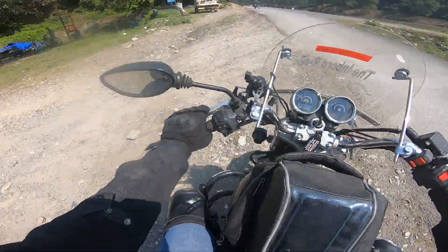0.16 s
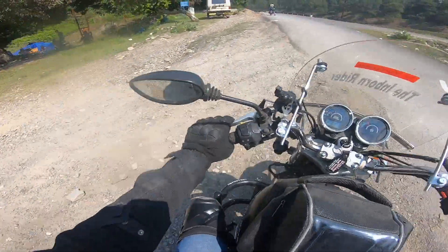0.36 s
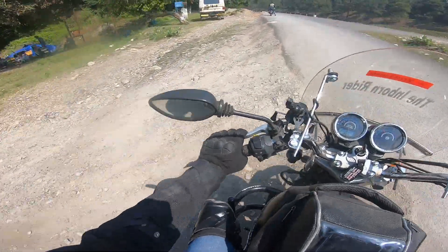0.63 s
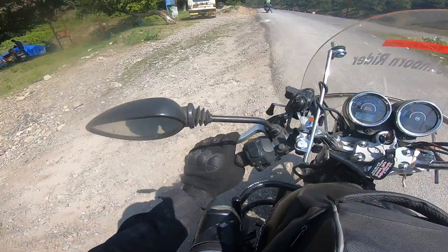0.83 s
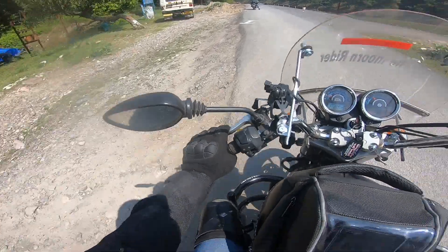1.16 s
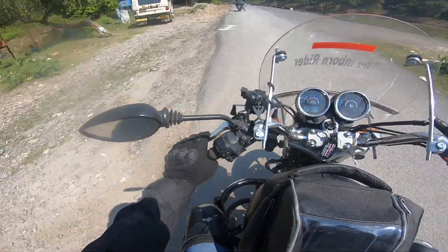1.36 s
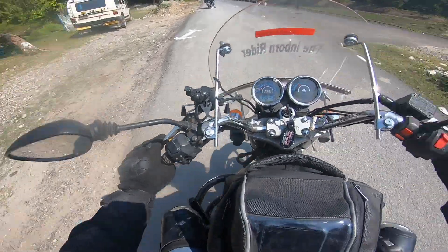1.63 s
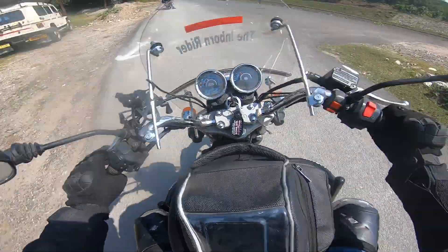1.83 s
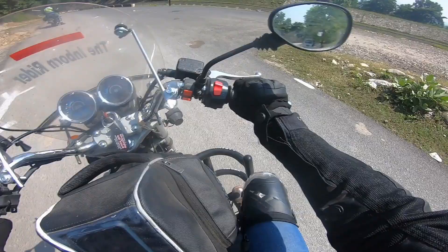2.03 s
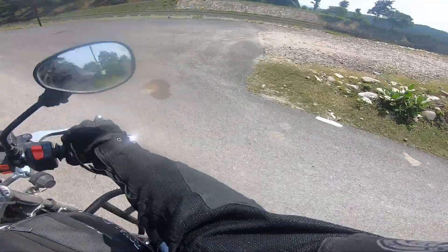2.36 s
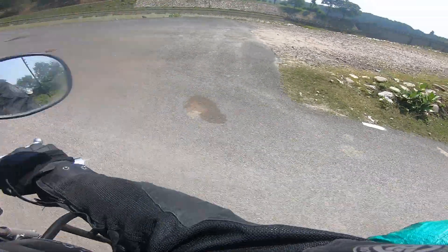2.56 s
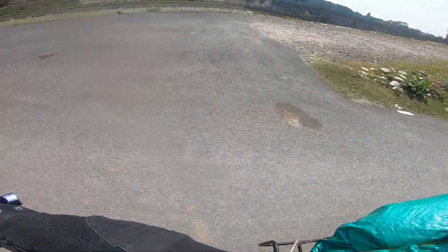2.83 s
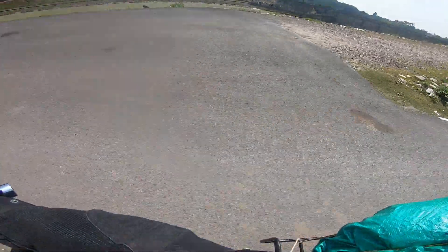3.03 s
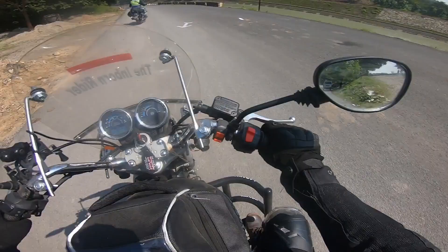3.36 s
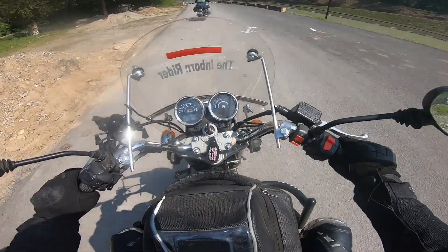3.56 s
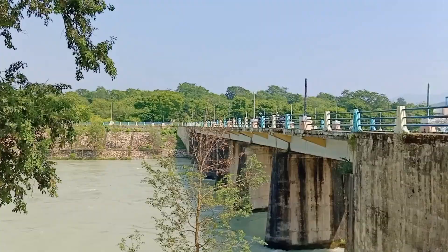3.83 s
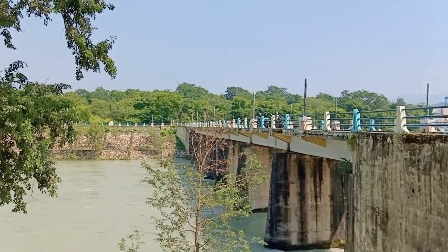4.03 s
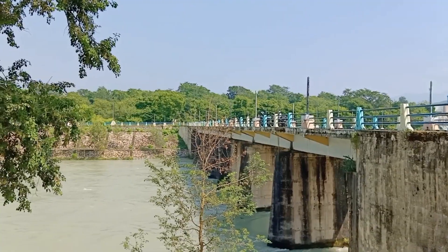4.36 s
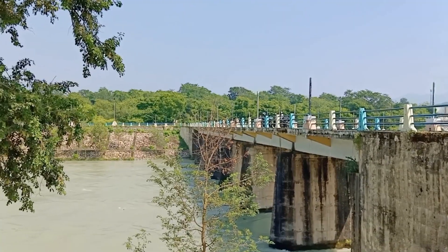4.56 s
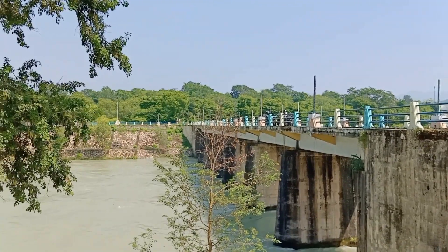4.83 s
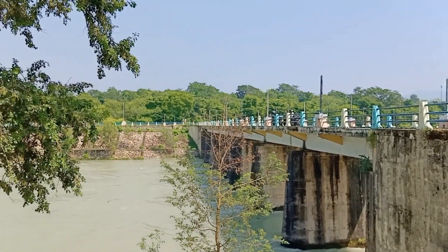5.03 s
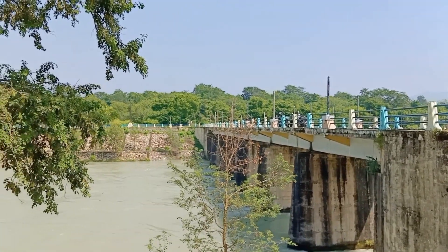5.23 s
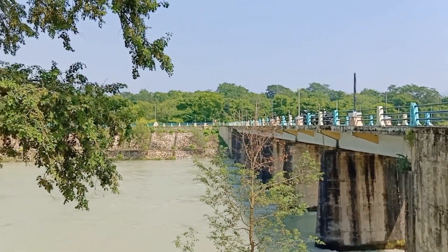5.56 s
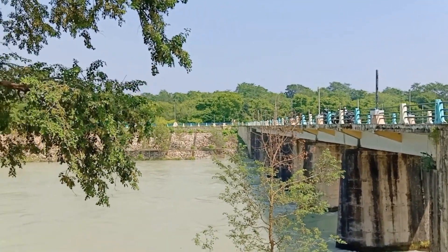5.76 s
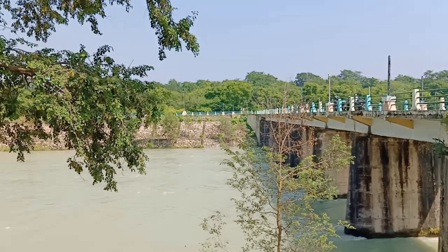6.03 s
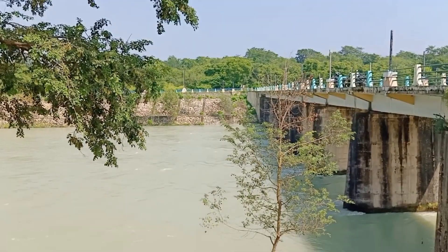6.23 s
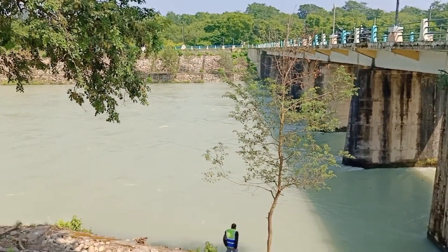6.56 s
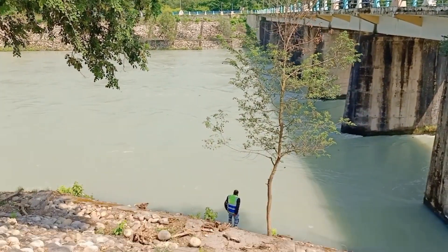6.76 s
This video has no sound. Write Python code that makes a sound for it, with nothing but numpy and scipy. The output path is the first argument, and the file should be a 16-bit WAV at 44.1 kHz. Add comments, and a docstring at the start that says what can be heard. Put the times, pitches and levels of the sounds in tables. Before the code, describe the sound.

Two single-cylinder motorcycles boom, clatter and thump over crunching gravel, easing through a turn, then cut abruptly to a quiet riverside with rushing water and chirps.

```python
"""On a gravel shoulder, heard inside a rider's helmet, two single-cylinder motorcycles pull away.
The near engine booms and clatters until its throttle shuts; the other thumps close by, slows and picks up.
The engines are pulses, one or two per cycle, that ring metal bodies; wind, tyres and grit are shaped noise.
The ride cuts off and a quiet river bank fades in: noise for water, rustles and insects, ringing bubbles
and knocks, and high falling whistles, perhaps small birds."""
import sys
import numpy as np
from scipy import signal
from scipy.fft import rfft, irfft, next_fast_len
from scipy.io import wavfile
from scipy.ndimage import uniform_filter1d, map_coordinates

SR = 44100
rng = np.random.default_rng(int(sys.argv[2]) if len(sys.argv) > 2 else 0)


def put_to_file(sound):
    """Save the sound as 16-bit audio at rate SR, in the file named by the first command-line argument."""
    columns = np.atleast_2d(sound).T  # one column per channel
    safe = np.clip(columns, -1, 1)
    whole_steps = np.round(safe * 32767)
    wavfile.write(sys.argv[1], SR, whole_steps.astype(np.int16))


N = 303716
TIME = np.arange(N) / SR
SIZE = next_fast_len(N, real=True)
BINS_HZ = np.fft.rfftfreq(SIZE, 1 / SR)

# In every spectrum and every list of ringing tones, level_db only compares its own rows.
# hiss of gears and chain, also used for sprayed gravel: pitch_hz, level_db (per Hz)
HISS_SPECTRUM = [(530, -55.5), (900, -16), (1120, -11.5), (1240, -6.5), (1690, -11), (1930, -11.5),
                 (2150, -12.5), (2570, -16.5), (2790, -14), (3400, -22), (3950, -21), (5000, -24),
                 (6050, -37), (8050, -38.5), (13400, -71.5), (15500, -79)]
# dry rustle, also the colour of one tick: pitch_hz, level_db (per Hz)
RUSTLE_SPECTRUM = [(100, -30), (400, 6), (2500, 0.5), (5800, 1), (8000, -14.5), (12000, -9.5), (15500, -15)]
# high falling chirps, perhaps small birds: middle_s, level_db, half_length_s
BIRD_CHIRPS = [(4.2, -47.5, 0.035), (5.02, -53, 0.016), (5.39, -55, .02), (5.52, -59, .05),
               (5.775, -44, 0.02), (5.87, -51, 0.014), (5.95, -49, 0.037), (6.2, -58, 0.018),
               (6.47, -53, 0.017), (6.67, -41, 0.015), (6.795, -42.5, 0.015)]


def amp(db):
    """Turns decibels into a factor on the waveform."""
    return 10 ** (np.asarray(db) / 20)


def evened(x):
    """Scales a signal to an average (RMS) size of 1."""
    return x / np.sqrt(np.mean(x ** 2) + 1e-20)


def follow(rows):
    """Draws straight lines between the rows, giving every column a value at each sample."""
    s, *columns = np.transpose(rows)
    return [np.interp(TIME, s, c) for c in columns]


def read(points, hz):
    """Reads a spectrum between its points, along a log-frequency axis."""
    f, value = np.transpose(points)
    return np.interp(np.log(hz + 1), np.log(f + 1), value)


def filtered(x, gain):
    """Applies a gain to every frequency bin."""
    return irfft(rfft(x, SIZE) * gain, SIZE)[:N]


def colour(x, spectrum):
    """Filters a sound by a spectrum; white noise keeps its level."""
    return filtered(x, evened(amp(read(spectrum, BINS_HZ))))


def noise(spectrum):
    """Makes random noise with the given spectrum."""
    return colour(rng.standard_normal(N), spectrum)


def wide(spectrum, same):
    """Makes two channels of noise with a given likeness: 0 separate, 1 identical."""
    shared = noise(spectrum)
    separate = np.array([noise(spectrum), noise(spectrum)])
    return np.sqrt(same) * shared + np.sqrt(1 - same) * separate


def wander(hz):
    """Makes a random drift of unit size whose changes fade out above the given rate."""
    return evened(filtered(rng.standard_normal(N), 1 / (1 + (BINS_HZ / hz) ** 4)))


def swells(rows):
    """Makes bell-shaped rises of level."""
    return sum(amp(db) * np.exp(-((TIME - s) / half) ** 2 / 2) for s, db, half in rows)


def blows(rows):
    """Makes sudden rises of level that die away."""
    return sum(amp(db) * (TIME >= s) * np.exp(-abs(TIME - s) / decay) for s, db, decay in rows)


def add(mix, s, sound):
    """Mixes a sound in at the given time."""
    part = mix[max(round(s * SR), 0):][:len(sound)]
    part += sound[:len(part)]


def body(modes, rise_s, pitch=1):
    """Gives what one blow rings with: dying tones that build up over rise_s."""
    t = TIME[:SR // 5]
    tones = sum(amp(db - 60 * t / t60) * np.sin(2 * np.pi * hz * pitch * t) for hz, db, t60 in modes)
    return tones * (1 - np.exp(-(t / rise_s) ** 2))


def struck(rows, modes, rise_s):
    """Strikes one object at set strengths and pitches; it radiates little below its lowest tone."""
    out = np.zeros(N)
    for s, db, pitch in rows:
        low_cut = signal.butter(2, .7 * pitch * min(modes)[0], "high", fs=SR, output="sos")
        sound = signal.sosfilt(low_cut, body(modes, rise_s, pitch))
        add(out, s, amp(db) * sound / abs(sound).max())
    return out


def ring(drive, modes, rise_s, stretch=1):
    """Rings a body with many blows, perhaps bent in pitch, to unit level."""
    # the body rings on its own clock, which runs faster where the pitch is raised
    clock = np.cumsum(stretch * np.ones(N))
    own_drive = np.bincount(np.round(clock).astype(int), drive)
    rung = signal.oaconvolve(own_drive, body(modes, rise_s))
    return evened(map_coordinates(rung, [clock], order=3))


def strokes(cycles, place, uneven_db, jitter_s):
    """Makes one pulse each time an engine passes a place in its cycle, uneven in size and timing."""
    at = np.flatnonzero(np.diff(np.floor(cycles - place)) > 0)
    size, late = rng.standard_normal((256, 2))[:len(at)].T
    moved = at + np.round(late * jitter_s * SR).astype(int)
    out = np.zeros(N)
    out[np.clip(moved, 0, N - 1)] = amp(uneven_db * size)
    return out


def surge(cycles, rise, decay):
    """Makes a level that swells and dies once in every cycle; times are shares of a cycle."""
    phase = cycles % 1
    return (1 - np.exp(-(phase / rise) ** 2)) * np.exp(-phase / decay) * (1 - phase ** 10)


def river():
    """Water is a steady noisy wash, less alike between the ears in the treble."""
    # wash of water: pitch_hz, level_db (per Hz)
    spectrum = [(24, -55), (40, -18), (130, -4), (200, -4), (305, -2), (420, -6.5), (540, -4), (810, -4),
                (1000, -7.5), (1350, -8.5), (2200, -6), (2700, -8.5), (3300, -15.5), (4000, -14.5),
                (5720, -13), (7160, -32), (13300, -38), (15500, -46)]
    # how alike left and right are: pitch_hz, likeness (1 identical; below 0 counts as 0)
    likeness = [(60, 0.81), (180, 1), (550, 0.7), (1650, -0.19), (4970, -0.22), (15000, -0.068)]
    same = np.clip(read(likeness, BINS_HZ), 0, 1)
    mid = filtered(noise(spectrum), np.sqrt((1 + same) / 2))
    side = filtered(noise(spectrum), np.sqrt((1 - same) / 2))
    return amp(-41.5) * np.array([mid + side, mid - side]) * amp(0.28 * wander(11))


def bubbles():
    """Small bubbles in the current each ring at one of twelve pitches."""
    births_per_s, low_hz, high_hz, t60_s = 100, 561, 835, 0.057
    pitches = np.geomspace(low_hz, high_hz, 12)
    out = np.zeros(N)
    for hz in pitches:
        born = rng.random(N) < births_per_s / len(pitches) / SR
        strength = amp(1.9 * np.minimum(rng.exponential(1, N), 3))
        out += signal.oaconvolve(born * strength, body([(hz, 0, t60_s)], rise_s=0.0033))[:N]
    return amp(-52.5) * evened(out)


def insects():
    """Insects shrill as a band of flickering noise; the same band swells under each bird chirp."""
    # shrill band: pitch_hz, level_db (per Hz)
    spectrum = [(3500, -50), (5000, -7), (5700, 2.5), (6200, -4), (7000, -15.5), (8500, -45)]
    level = amp(-57.5) + .55 * swells(BIRD_CHIRPS)
    return wide(spectrum, same=0.28) * level * evened(amp(3.3 * wander(90)))


def small_birds():
    """Each chirp, perhaps a small bird's, is a thin, fuzzy whistle that slides down."""
    middle_hz, fall, fuzz_hz = 5850, .085, 260  # fall is the share of pitch lost per half length
    out = np.zeros(N)
    for s, db, half in BIRD_CHIRPS:
        u = np.arange(-3 * half, 3 * half, 1 / SR) / half
        turns = np.cumsum(middle_hz * np.exp(-fall * u)) / SR
        add(out, s - 3 * half, amp(db) * np.exp(-u ** 2 / 2) * np.sin(2 * np.pi * turns))
    shared_fuzz = wander(fuzz_hz)
    ear_fuzz = np.array([wander(fuzz_hz), wander(fuzz_hz)])
    return out * (.8 * shared_fuzz + .8 * ear_fuzz)


def rustles():
    """Rustles and scuffs close by are short swells of rough noise."""
    # dry rustles: middle_s, level_db, half_length_s
    rustle_times = [(4.175, -40.5, 0.077), (4.555, -41, 0.057)]
    # duller scuffs: middle_s, level_db, half_length_s
    scuff_times = [(4.665, -46, 0.0099), (4.715, -42.5, 0.035), (5.917, -44, 0.0056), (5.998, -39.5, 0.025),
                   (6.367, -41.5, 0.0044)]
    # colour of the scuffs: pitch_hz, level_db (per Hz)
    scuff_spectrum = [(80, -25), (300, 7), (1200, 2.5), (2800, 0.5), (5000, -14), (12000, -28)]
    dry_rustle = wide(RUSTLE_SPECTRUM, same=.3) * swells(rustle_times) * evened(amp(1.8 * wander(120)))
    scuff = wide(scuff_spectrum, same=0.49) * swells(scuff_times) * evened(amp(3.3 * wander(200)))
    return dry_rustle + scuff


def knocks():
    """Knocks ring something hollow, and one tick is a dying burst of noise."""
    # knocks: start_s, level_db (of the peak), pitch_factor
    knock_times = [(4.667, -30, 0.59), (4.706, -34, 1.9), (4.714, -32, 1.53), (5.623, -30, 1.1),
                   (5.643, -23, 1.1), (5.647, -18.5, 0.97), (5.674, -30, 0.97), (5.681, -31, 1),
                   (5.697, -30, 1.3), (5.703, -30, .8), (5.732, -32, 0.74), (5.996, -34, 2.5),
                   (6.008, -32, 0.73), (6.115, -32, .5), (6.25, -27, 1.18)]
    # tones of the hollow object: pitch_hz, level_db, t60_s (time to fall 60 dB)
    hollow = [(290, -6, .03), (540, 0, .03), (820, -2, .022), (1400, -6, .009), (2250, -16, .009)]
    # the tick: start_s, level_db, decay_s
    tick = (6.692, -33, 0.0024)
    return struck(knock_times, hollow, rise_s=0.00041) + wide(RUSTLE_SPECTRUM, same=0.58) * blows([tick])


def bank():
    """The river bank adds up its sources, leaning very slightly to the left."""
    sources = river() + bubbles() + insects() + small_birds() + rustles() + knocks()
    return sources * amp([[.35], [-.35]])


def gravel():
    """How loose the ground is: 1 on the shoulder, thinning to 0 on clean asphalt."""
    thins_s, ends_s = 1.71, 2.96
    return np.interp(TIME, [thins_s, ends_s], [1, 0])


def wind():
    """Air shakes the helmet in low noise, more on loose ground, with gusts and one puff as the head turns."""
    # steady buffeting: pitch_hz, level_db (per Hz)
    buffet_spectrum = [(10, -13), (25, -6.5), (50, -8), (90, -3.5), (160, -10), (300, -18.5), (600, -29),
                       (1500, -87)]
    # low puff as the head turns: middle_s, level_db, half_length_s
    puff = (2.432, -16.5, .016)
    # colour of the puff: pitch_hz, level_db (per Hz)
    puff_spectrum = [(30, -29), (80, -5), (110, 7), (220, -30), (800, -71), (6000, -120)]
    # gusts that shake the helmet: middle_s, level_db, half_length_s
    gusts = [(.17, -27, .03), (.82, -26, .06), (2.45, -27, .05), (3.1, -29, .2)]
    # colour of the gusts: pitch_hz, level_db (per Hz)
    gust_spectrum = [(12, -14), (28, 0), (50, 0), (80, -8), (200, -30), (1000, -90)]
    shaking = evened(amp(1.8 * wander(7.6) + 2.5 * gravel()))
    buffet = amp(-25) * noise(buffet_spectrum) * shaking
    return buffet + noise(puff_spectrum) * swells([puff]) + noise(gust_spectrum) * swells(gusts)


def tyres():
    """Tyres rush as noise, louder on gravel, and scrub through the turn, where air rushes too."""
    # rush of tyres and air: pitch_hz, level_db (per Hz)
    rush_spectrum = [(60, -16), (150, 0.5), (195, -3), (300, 2.5), (390, -5.5), (490, -1.5), (620, -1.5),
                     (740, 1.5), (880, -6), (1050, -2.5), (1700, -21), (4000, -36), (9000, -81)]
    # rush of air in the turn: middle_s, level_db, half_length_s
    turn_gust = (2.86, -38.5, 0.12)
    # colour of the scrub: pitch_hz, level_db (per Hz)
    scrub_spectrum = [(200, -8), (500, 7.5), (800, 0), (1150, 3), (1600, -6), (3000, -16), (8000, -48),
                      (15000, -77)]
    # scrubs through the turn: middle_s, level_db, half_length_s
    scrubs = [(2.625, -32, 0.018), (2.81, -43, .045), (2.9, -31.5, 0.016), (2.99, -32, .007)]
    asphalt_db, gravel_adds_db = -42.5, 13
    rush_level = amp(asphalt_db + gravel_adds_db * gravel()) + swells([turn_gust])
    rush = rush_level * noise(rush_spectrum) * evened(amp(1.2 * wander(25)))
    return rush + noise(scrub_spectrum) * swells(scrubs) * evened(amp(2.3 * wander(80)))


def grit():
    """Grit crackles as random tiny noise bursts, weaker on asphalt; stones spit from the tyres."""
    # colour of grit and stones: pitch_hz, level_db (per Hz)
    spectrum = [(700, -42), (2500, 5), (5000, -4), (8000, -5), (14000, -39)]
    # stones spat from the tyres: start_s, level_db, decay_s
    stones = [(.225, -40, 0.015), (.47, -37, .006), (.82, -36, .008), (2.13, -35, 0.0041),
              (2.19, -46, .003), (2.27, -46, .004), (2.455, -46, .01)]
    # fine gravel thrown up as the bike pulls: middle_s, level_db, half_length_s
    spray = (0.97, -31, 0.1)
    grains_per_s = 380
    strength = amp(6.0 * np.minimum(rng.exponential(1, N), 3))
    grains = (rng.random(N) < grains_per_s / SR) * strength * rng.choice([-1, 1], N)
    burst = rng.standard_normal(900) * np.exp(-TIME[:900] / 0.0039)
    crunch = evened(colour(signal.oaconvolve(grains, burst)[:N], spectrum))
    crackle = amp(-47.0) * (0.28 + 0.66 * gravel()) * crunch
    return crackle + noise(spectrum) * blows(stones) + noise(HISS_SPECTRUM) * swells([spray])


def sand():
    """Sand hisses in treble noise while the ground is loose, and grinds under the tyres."""
    # fine sand: pitch_hz, level_db (per Hz)
    sand_spectrum = [(2500, -27.5), (5000, -4), (8000, -2.5), (10000, -5), (11500, -7), (14000, -13),
                     (15500, -29)]
    # colour of the grinding: pitch_hz, level_db (per Hz)
    grind_spectrum = [(2500, -34), (5000, 0), (8200, 1.5), (9800, -11.5), (11000, -19), (15000, -42)]
    # sand ground under the tyres: middle_s, level_db, half_length_s
    grinds = [(.235, -48, .018), (.87, -52, 0.06), (2.28, -54.5, 0.082), (2.47, -53, 0.043),
              (2.62, -54, 0.034)]
    steady = noise(sand_spectrum) * amp(-62.5) * gravel()
    return (steady + noise(grind_spectrum) * swells(grinds)) * evened(amp(3.2 * wander(150)))


def clunks():
    """The frame and luggage clunk as single blows on a ringing case."""
    # clunks: start_s, level_db (of the peak), pitch_factor
    clunk_times = [(2.318, -14, 0.18), (2.486, -12.5, 0.58), (2.628, -23, 1.1), (2.735, -19, 0.62),
                   (2.865, -20, 0.63), (3.203, -13, 0.52), (3.485, -24, 1.1)]
    # tones of the case: pitch_hz, level_db, t60_s
    case = [(290, -6.5, 0.022), (536, -0.5, 0.018), (822, -3, .014), (1440, -1, .006), (2200, -15, 0.0071)]
    return struck(clunk_times, case, rise_s=.002)


def slugs(firings, load):
    """Gas leaves in pulses, steep in front and slack behind, narrower under load, and echoes off the road."""
    base_width_s, load_narrows, skew, uneven = .0015, 0.15, .1, .08
    echo_s, echo_db = .0079, -12.5
    out = np.zeros(N)
    t = TIME[:SR // 50] - .0051
    soft_start = np.minimum(TIME[:len(t)] / .001, 1)
    for at, chance in zip(np.flatnonzero(firings), rng.standard_normal(256)):
        width = base_width_s * (1 - load_narrows * load[at]) * np.exp(uneven * chance)
        # the log squeezes the front of the pulse and stretches its back
        u = np.log(np.maximum(1 + skew * t / width, 1e-3)) / skew
        add(out, at / SR, firings[at] * soft_start * (u ** 2 - 1) * np.exp(-u ** 2 / 2))
    return evened(out + amp(echo_db) * np.roll(out, int(echo_s * SR)))


def other_engine():
    """Each firing is a slug of gas, a turbulent gasp and the pipe's low ring; load adds a bark."""
    # engine speed: time_s, firing_rate_hz
    speed_curve = [(1.2, 18.57), (1.5, 19.24), (1.75, 18.4), (2.2, 18.29), (2.5, 14.46), (2.7, 13.87),
                   (2.87, 12.39), (3.0, 14.22), (3.3, 16.06), (3.6, 17.67), (3.93, 19.6)]
    # as it draws alongside: time_s, distance_m, load (0-1, sharpens each thump)
    alongside = [(.75, 10.4, .15), (1.45, 3.1, .75), (2.05, 3, .75), (2.3, 1.75, .5), (2.45, 1.6, .42),
                 (2.7, 2.1, .15), (3.0, 1.65, .45), (3.5, 2.24, 0.38), (3.92, 2.04, 1)]
    # low tones of the pipe: pitch_hz, level_db, t60_s
    pipe_modes = [(86.5, -0.5, .115), (151, -5.5, 0.062)]
    # higher tones of the bark: pitch_hz, level_db, t60_s
    bark_modes = [(215, -2.5, .034), (265.7, -0.5, 0.033), (375, -5, .024), (752, -12.5, 0.031)]
    # turbulent gas behind each thump: pitch_hz, level_db (per Hz)
    gasp_spectrum = [(40, -10), (100, 4), (260, -3), (400, -9.5), (600, -28), (850, -22), (2000, -60.5)]
    # treble spit of the exhaust: pitch_hz, level_db (per Hz)
    spit_spectrum = [(700, -44.5), (2500, 5.5), (5000, -1), (8500, -8.5), (10000, -24), (14000, -59)]
    start_cycles, pipe_delay_s, bark_delay_s = .58, 0.0023, 0.00212
    base_db, base_hz, db_per_hz = -13.5, 18.34, 1.1  # level at 1 m and this firing rate; rise with revs

    speed, = follow(speed_curve)
    cycles = start_cycles + np.cumsum(speed) / SR
    distance, load = follow(alongside)
    level_db = base_db + db_per_hz * (speed - base_hz)
    firings = strokes(cycles, 0, uneven_db=0.14, jitter_s=0.00022)
    # ring and bark set in as the slug leaves the pipe
    surges = np.roll(firings, int(pipe_delay_s * SR)) * amp(1.8 * wander(11))
    pipe = -ring(surges, pipe_modes, rise_s=0.005, stretch=np.exp(0.049 * wander(9)))
    late_firings = np.roll(firings, int(bark_delay_s * SR))
    bark = ring(late_firings, bark_modes, rise_s=0.0025, stretch=np.exp(0.05 * wander(16)))
    gasp = amp(-14.5) * noise(gasp_spectrum) * evened(surge(cycles - .04, rise=.05, decay=.22))
    # the extra division by distance: treble carries less far
    spit = amp(-12) / distance * noise(spit_spectrum) * surge(cycles, rise=.045, decay=.1)
    thump = (.64 + .04 * load) * slugs(firings, load) + (1.2 - 1.0 * load) * pipe + 0.79 * load * bark
    return amp(level_db) / distance * (thump + gasp + spit)


def throttle():
    """The rider's hand holds an opening from 0 to 1 and adds twists: open, hold, close."""
    # cruising, shut for the turn, eased open again: time_s, opening (0-1)
    held = [(2.19, 0.73), (2.33, .5), (2.6, 0.2), (3.35, 0), (3.9, 0.57)]
    # twists on top: start_s, end_s, extra_opening (0-1)
    twists = [(.2, 0.372, .12), (.84, 1.102, .2), (1.38, 2.13, .19)]
    wrist_s = 0.14  # time the wrist takes to open or close
    opening, = follow(held)
    for start, end, extra in twists:
        inside = np.minimum(TIME - start, end - TIME)
        opening = opening + extra * np.clip(inside / wrist_s + .5, 0, 1)
    return opening


def near_exhaust(cycles, opening):
    """The pipe rings once a cycle, weaker as the throttle shuts; a swell of noise burbles on the overrun."""
    # tones of the pipe: pitch_hz, level_db, t60_s
    pipe_modes = [(86, -11, 0.08), (140, 7.5, 0.083)]
    # burble: middle_s, level_db, half_length_s
    burble_time = (2.777, -24.5, .07)
    # colour of the burble: pitch_hz, level_db (per Hz)
    burble_spectrum = [(50, -25), (115, 0), (240, 0), (340, -4), (520, -13), (800, -23), (4000, -81)]
    full_db, shut_loses_db = -19, 12
    firings = strokes(cycles, .75, uneven_db=0.4, jitter_s=0.00021)
    pipe = ring(firings, pipe_modes, rise_s=0.0038)
    burble = noise(burble_spectrum) * swells([burble_time]) * evened(amp(4.0 * wander(60)))
    return amp(full_db - shut_loses_db * (1 - opening)) * pipe + burble


def airbox(cycles, speed, opening):
    """Gulps of air boom in the airbox, twice a cycle at high revs; the intake growls with revs and throttle."""
    # tones of the boom: pitch_hz, level_db, t60_s
    boom_modes = [(254, 1.5, .11), (292, 3.2, .11)]
    # tones of the growl: pitch_hz, level_db, t60_s
    growl_modes = [(328, 0, .06), (375, 2, 0.053), (420, -7, 0.037)]
    twin_from_hz, twin_span_hz = 22.6, 1.6  # above this rate the other crank turn gulps too
    boom_hz_law = .22  # how steeply the boom's pitch climbs with the revs
    boom_db, boom_shut_db = -15, 24  # at full throttle, and lost when shut
    growl_db, growl_hz, growl_db_per_hz, growl_shut_db = -20, 25, 1.5, 33
    shut = 1 - opening
    twin = np.clip((speed - twin_from_hz) / twin_span_hz, 0, 1)
    gulps = strokes(cycles, .9, uneven_db=1.1, jitter_s=.00014)
    gulps = gulps + 0.4 * twin * strokes(cycles, .4, uneven_db=2.5, jitter_s=0.00016)
    boom_pitch = (speed / 22.1) ** boom_hz_law * np.exp(.006 * wander(14))
    boom = ring(gulps, boom_modes, rise_s=0.007, stretch=boom_pitch)
    uneven_gulps = gulps * rng.uniform(0.36, 1, N)
    growl = ring(uneven_gulps, growl_modes, rise_s=.005, stretch=np.exp(.02 * wander(23)))
    growl_level_db = growl_db + growl_db_per_hz * (speed - growl_hz) - growl_shut_db * shut
    return amp(boom_db - boom_shut_db * shut) * boom + amp(growl_level_db) * growl


def clatter_level_db(speed, opening):
    """Clatter grows with the revs, eases while the engine pulls, and dies away below a light throttle."""
    base_db, base_hz, db_per_hz, pull_db = -31, 22.1, 0.2, 3
    light_throttle, shut_db = .68, 36
    pull_hz_per_s, pull_smooth_s = 4, 0.18  # a firm gain of revs, and how slowly the gear answers
    pull = np.tanh(np.gradient(speed) * SR / pull_hz_per_s)
    pull = uniform_filter1d(pull, int(pull_smooth_s * SR))
    coasting = np.maximum(1 - opening / light_throttle, 0)
    return base_db + db_per_hz * (speed - base_hz) - pull_db * pull - shut_db * coasting


def valves(cycles, speed, opening):
    """The valve gear taps the cylinder head on both crank turns; a gear wheel whines and hard rattles stand out."""
    # tones of the cylinder head: pitch_hz, level_db, t60_s
    head = [(1224, -1, 0.027), (1349, 1, 0.03), (1522, -2.5, 0.021), (1018, -7.5, 0.022),
            (2170, -16.5, 0.032), (2806, -17.5, .038)]
    # a gear wheel that keeps ringing: pitch_hz, level_db, t60_s
    wheel = [(1241, 0, .12)]
    # lift of the ring as the throttle shuts: time_s, pitch_factor
    overrun = [(2.14, 1), (2.36, 1.16), (2.5, 1)]
    # hard rattles of valve gear and chain: start_s, level_db (of the peak), pitch_factor
    rattles = [(.088, -11, 0.83), (.108, -13, 0.82), (.367, -14, 0.96), (.391, -14, 0.95),
               (1.731, -17, 0.91), (1.773, -20.5, 0.85), (2.122, -16, 0.85), (2.139, -16, 0.86),
               (2.239, -20, 0.88), (2.278, -15.5, 1), (2.317, -20.5, 1.1), (2.357, -22, 1.06),
               (3.798, -24.5, 1.01), (3.862, -23, 0.9), (3.898, -28, 0.98)]
    lift, = follow(overrun)
    taps = strokes(cycles, .92, uneven_db=2.2, jitter_s=.0007)
    taps = taps + 1.27 * strokes(cycles, .4, uneven_db=0.8, jitter_s=.0007)
    rough_taps = taps + .011 * rng.standard_normal(N)
    clatter = ring(rough_taps, head, rise_s=0.0017, stretch=lift * np.exp(0.0027 * wander(7.6)))
    whine = ring(taps + .015 * rng.standard_normal(N), wheel, rise_s=0.0046)
    whine = whine * amp(-2 - 90 * (lift - 1))  # chokes as the gears unload
    return amp(clatter_level_db(speed, opening)) * (clatter + whine) + struck(rattles, head, rise_s=.0008)


def casing(x):
    """Crankcase and cooling fins have many close tones: a short, dense ring."""
    t = TIME[:SR // 10]
    dense_ring = rng.standard_normal(len(t)) * np.exp(-t / 0.007)
    return evened(signal.oaconvolve(x, dense_ring)[:N])


def gear_hiss(cycles, opening):
    """Gears and chain hiss all the time, more once in each cycle and on loose ground, where the chain thrashes."""
    full_db, shut_loses_db, gravel_adds_db = -39, 3, 9.5
    gears = 0.66 * noise(HISS_SPECTRUM) + 0.68 * casing(noise(HISS_SPECTRUM))
    pulsing = evened(1 + 0.89 * surge(cycles - .86, rise=0.099, decay=0.26))
    level_db = full_db - shut_loses_db * (1 - opening) + gravel_adds_db * gravel()
    return amp(level_db) * gears * pulsing


def near_engine():
    """One turning cycle drives the exhaust, airbox, valve gear and hiss together."""
    # engine speed: time_s, firing_rate_hz
    speed_curve = [(0, 20.39), (.285, 19.5), (.447, 21.78), (.653, 20.75), (.99, 23.1), (1.184, 21.0),
                   (2.172, 25.69), (2.751, 20.0), (3.93, 20.67)]
    speed, = follow(speed_curve)
    cycles = .123 + np.cumsum(speed) / SR  # starts part-way through a cycle
    opening = throttle()
    exhaust = near_exhaust(cycles, opening)
    intake = airbox(cycles, speed, opening)
    return exhaust + intake + valves(cycles, speed, opening) + gear_hiss(cycles, opening)


def scene():
    """The ride stops dead; the river bank fades in."""
    cut_s = 3.9255
    road = wind() + tyres() + grit() + sand() + clunks()
    low_cut = signal.butter(2, 14, "high", fs=SR, output="sos")
    ride = signal.sosfilt(low_cut, road + other_engine() + near_engine()) * (TIME < cut_s)
    fade_db = np.interp(TIME, [3.93, 4.0, 4.05, 4.1, 4.15], [-36.0, -18.5, -6.5, -1.5, 1])
    return ride + bank() * amp(fade_db) * (TIME >= cut_s)


def record(dry):
    """Rounds off the highest peaks, then removes the treble above the band edge."""
    edge_hz = 15700
    rounded = dry / (1 + (dry / amp(-3.2)) ** 6) ** (1 / 6)
    low_pass = signal.firwin(511, edge_hz, window=("kaiser", 9), fs=SR)
    return signal.oaconvolve(rounded, low_pass[None], "same")


dry = scene()
out = record(dry)
put_to_file(out)
```